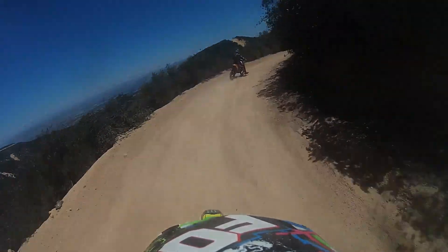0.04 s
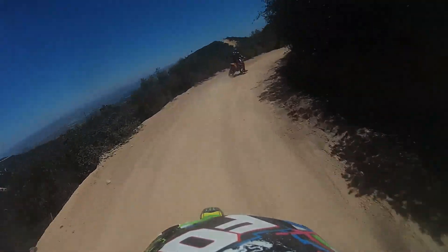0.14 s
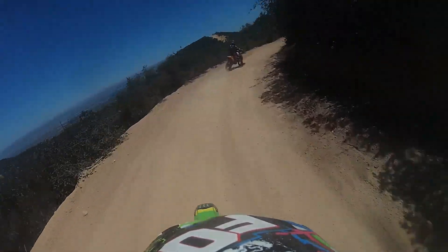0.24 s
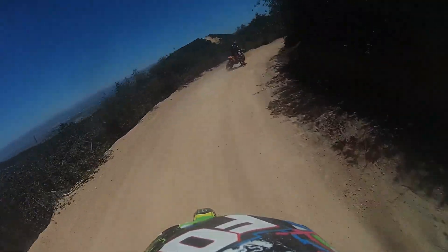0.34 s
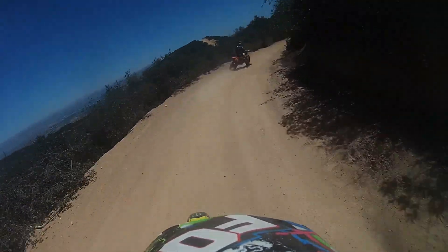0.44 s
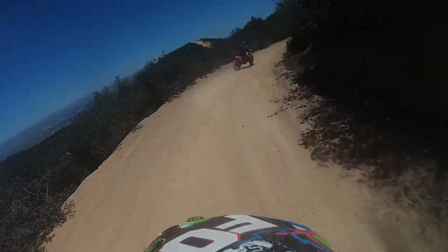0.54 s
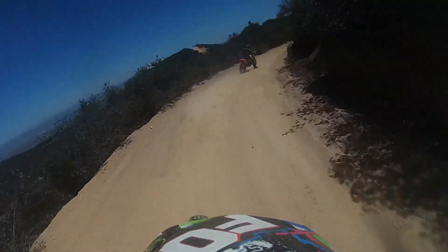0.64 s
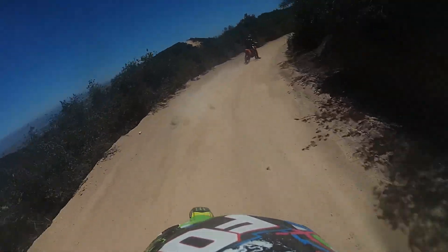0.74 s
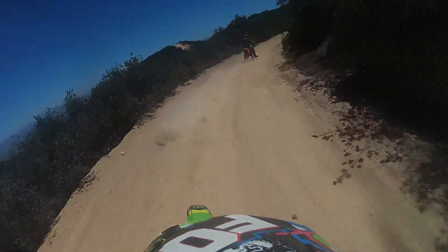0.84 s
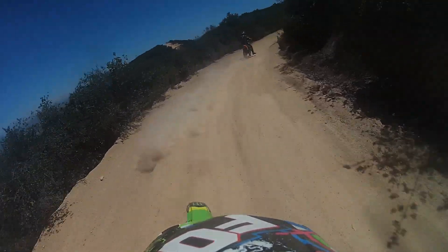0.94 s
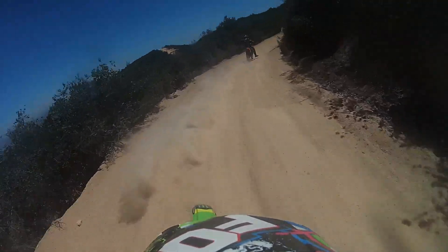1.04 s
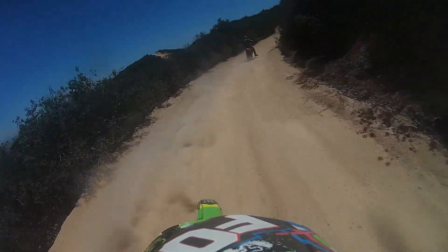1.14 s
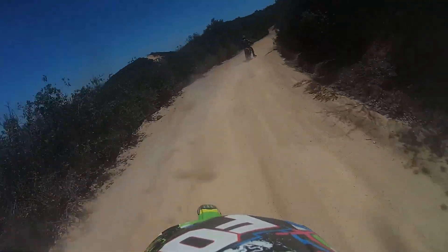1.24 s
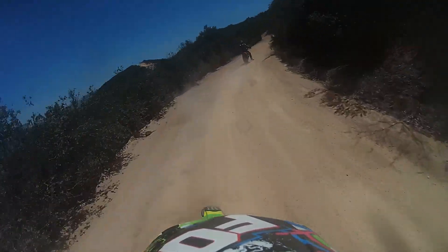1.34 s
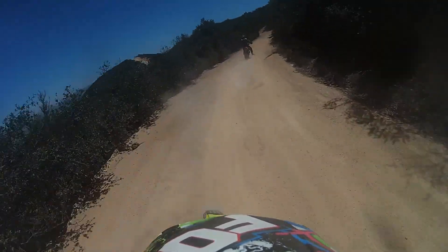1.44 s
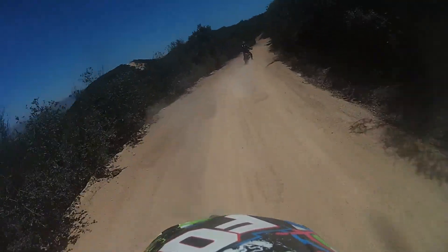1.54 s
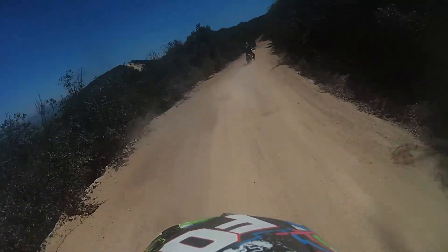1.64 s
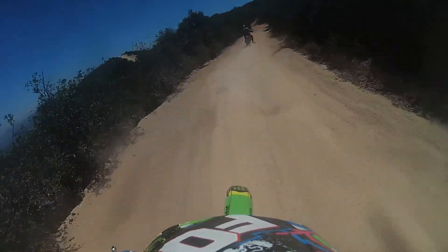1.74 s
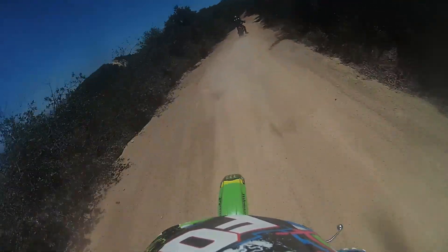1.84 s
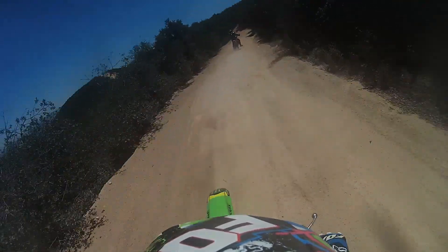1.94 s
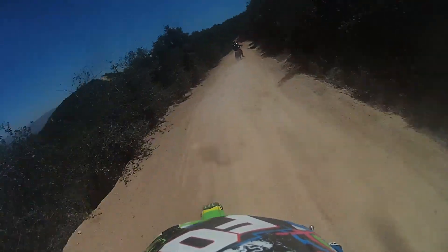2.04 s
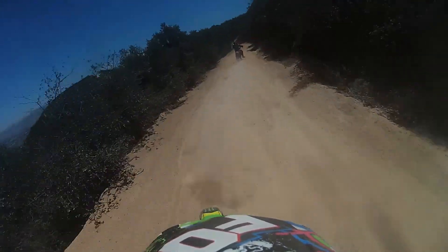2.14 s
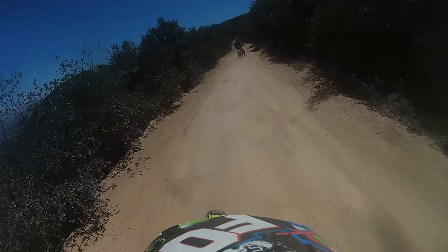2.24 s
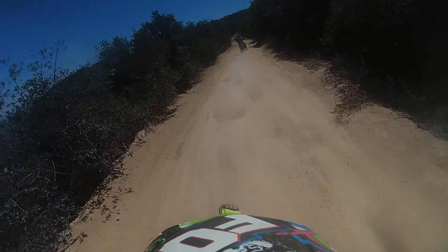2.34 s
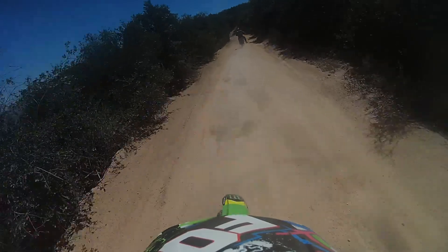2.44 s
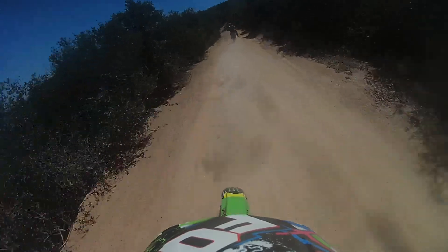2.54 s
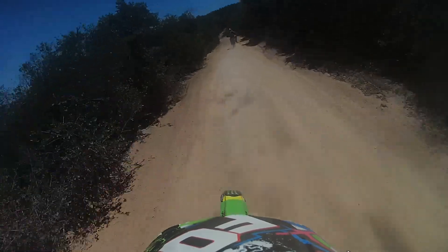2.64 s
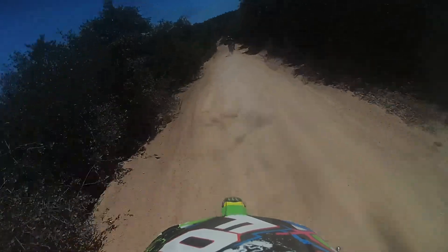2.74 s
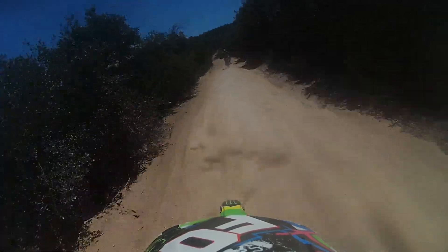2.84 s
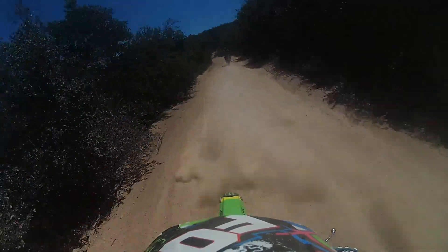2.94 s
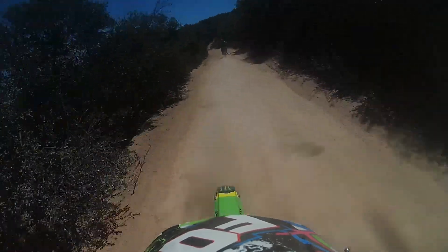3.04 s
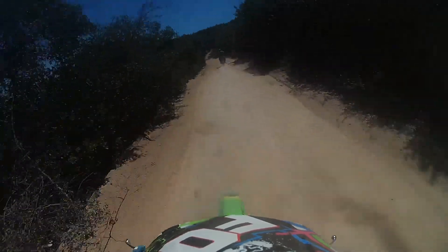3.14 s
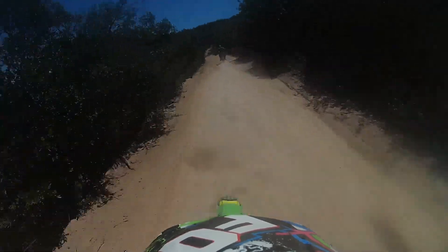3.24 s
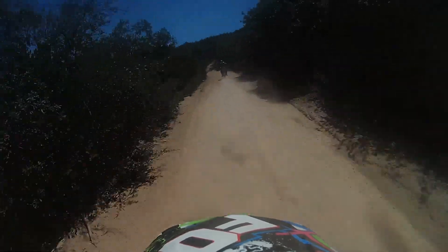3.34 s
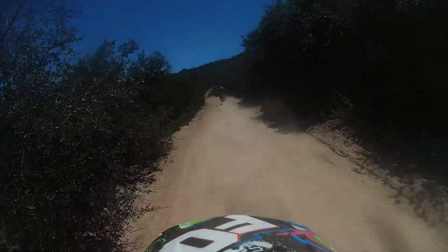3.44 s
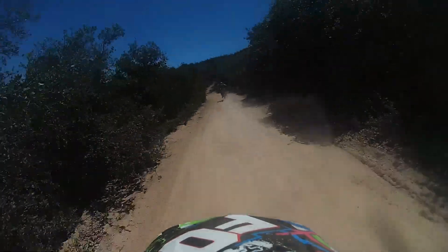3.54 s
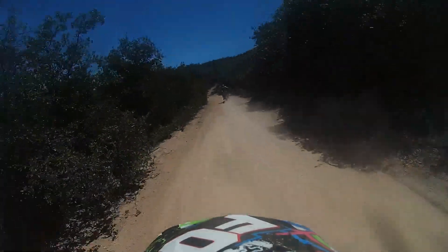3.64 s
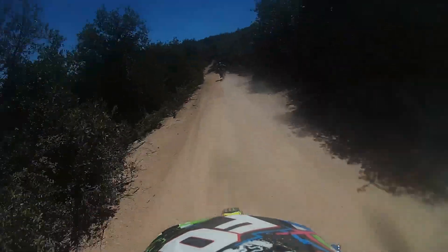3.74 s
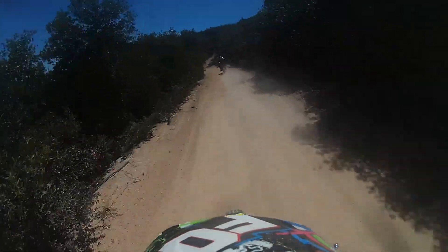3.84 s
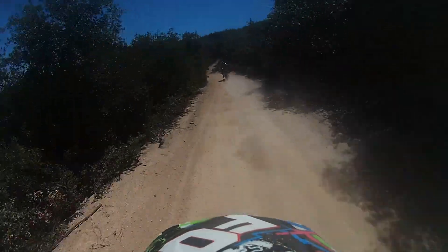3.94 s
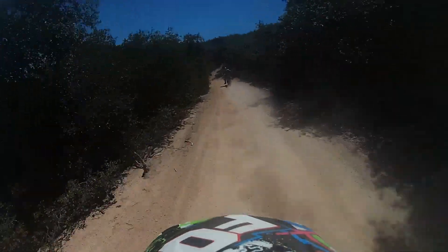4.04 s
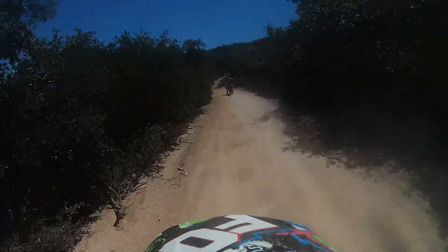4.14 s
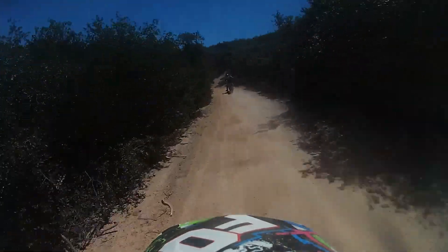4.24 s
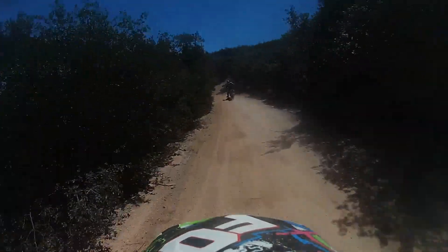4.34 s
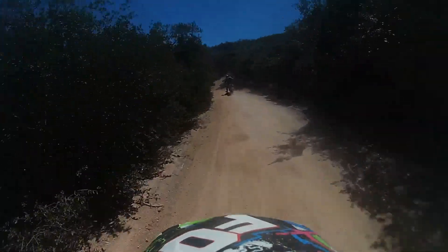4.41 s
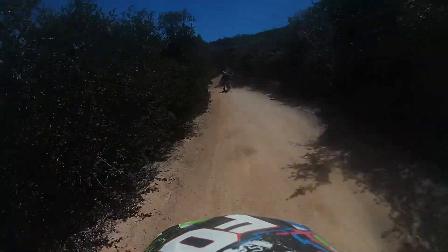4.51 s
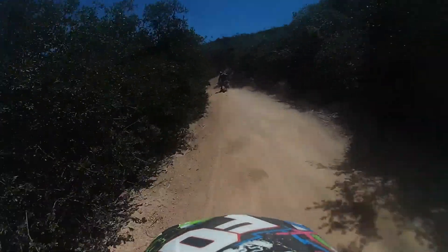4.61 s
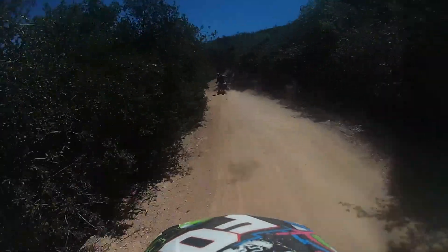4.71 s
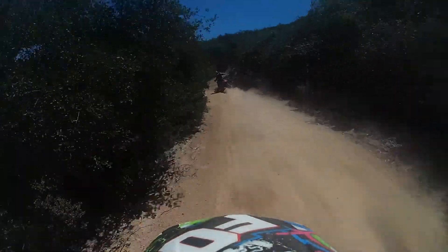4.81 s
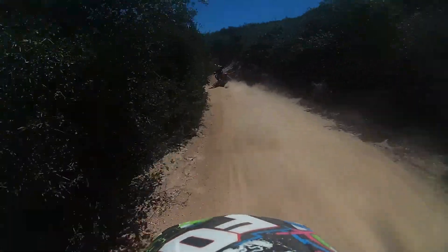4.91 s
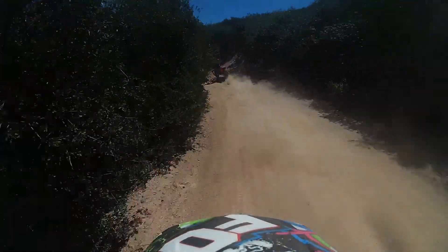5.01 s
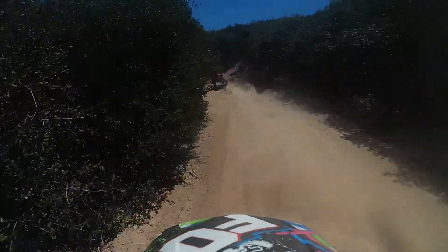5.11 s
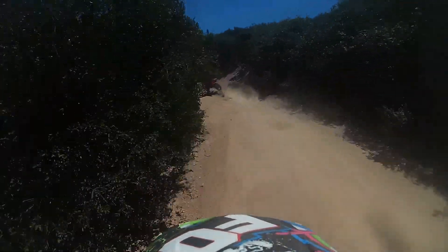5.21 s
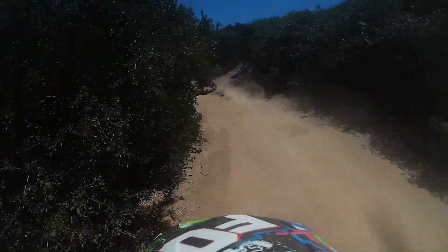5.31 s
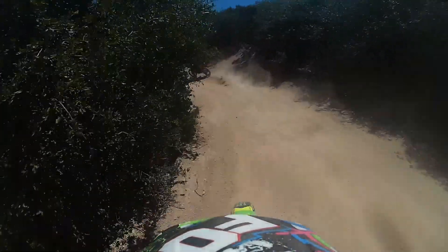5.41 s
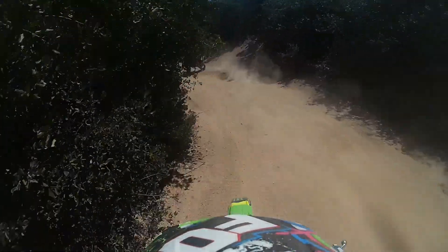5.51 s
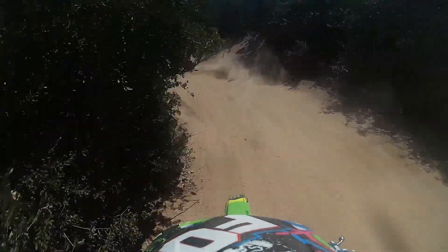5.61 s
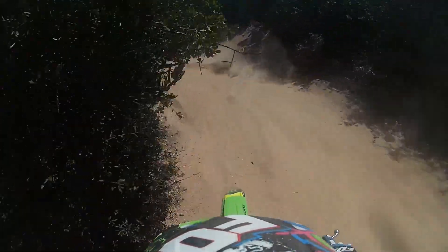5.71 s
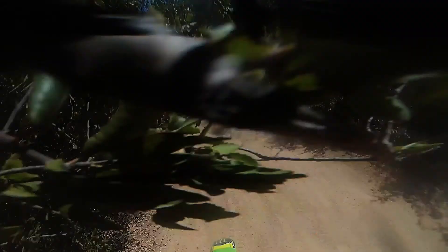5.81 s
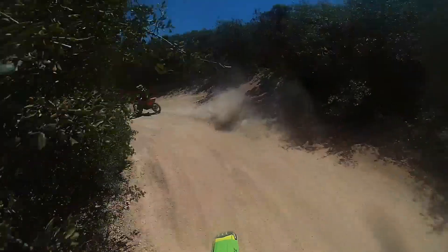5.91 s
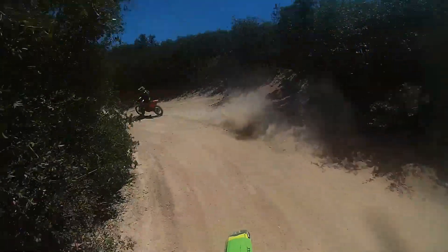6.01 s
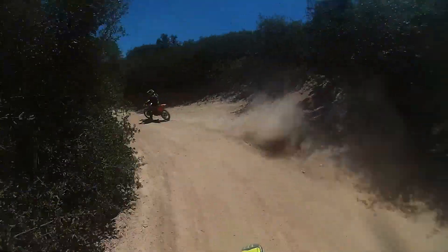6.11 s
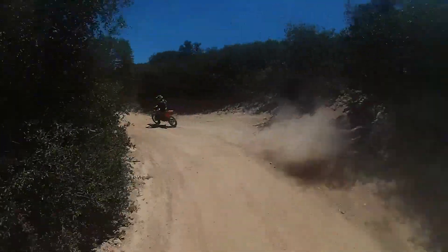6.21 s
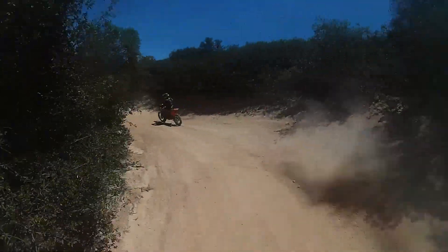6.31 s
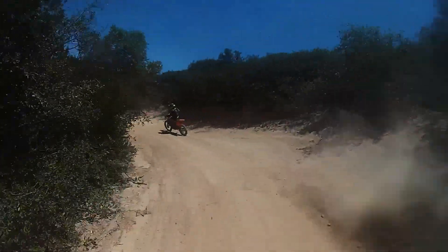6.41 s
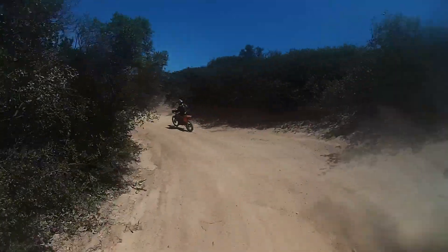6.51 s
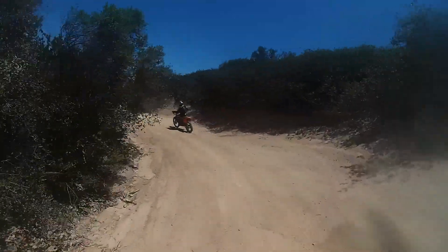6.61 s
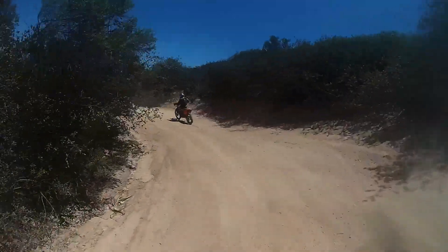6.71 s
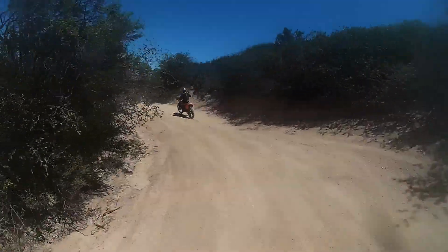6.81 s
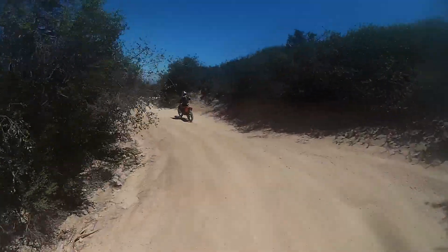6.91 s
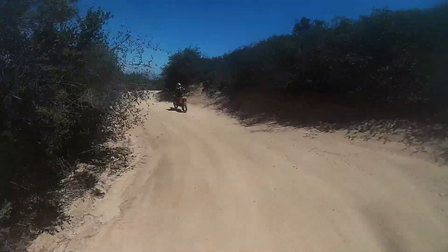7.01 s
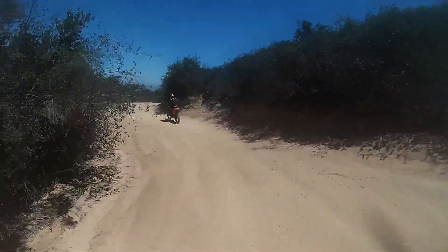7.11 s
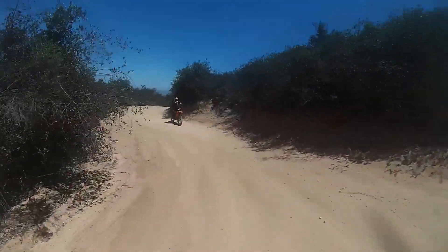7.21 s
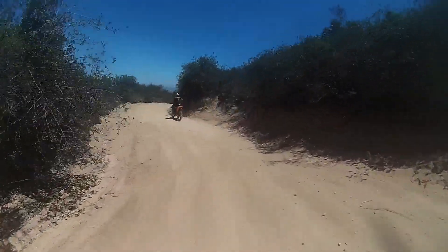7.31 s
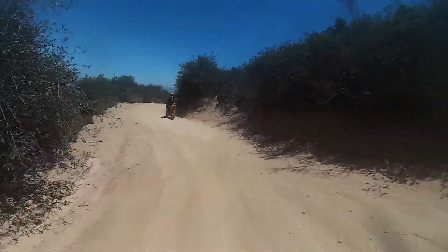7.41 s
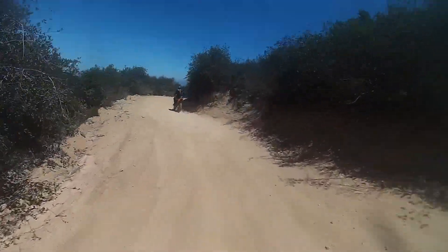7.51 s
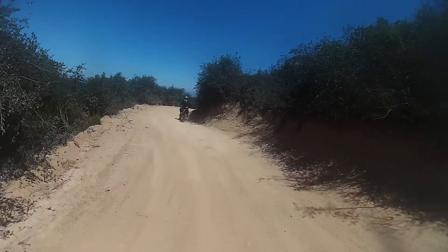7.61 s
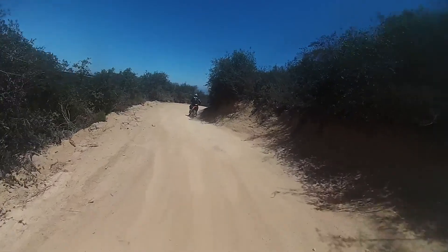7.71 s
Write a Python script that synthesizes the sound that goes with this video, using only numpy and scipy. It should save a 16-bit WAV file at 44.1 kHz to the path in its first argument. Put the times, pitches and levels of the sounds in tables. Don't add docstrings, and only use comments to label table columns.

```python
import sys
import numpy as np
from scipy import signal
from scipy.fft import rfft, irfft, next_fast_len
from scipy.io import wavfile
from scipy.ndimage import uniform_filter1d

SR = 44100
rng = np.random.default_rng(int(sys.argv[2]) if len(sys.argv) > 2 else 0)


def gain_from_db(level_db):
    decades = np.asarray(level_db, float) / 20
    return 10 ** decades


def unload_audio(sound):
    columns = np.transpose(np.atleast_2d(sound))
    steps = np.round(np.clip(columns, -1, 1) * 32767)
    wavfile.write(sys.argv[1], SR, steps.astype(np.int16))


N = 342216

# pitch_hz, level_db (per Hz for noises) # faint air hiss
HISS_SPECTRUM = [(1800, -40), (3000, -2), (4300, -4.5), (5400, -4.5), (6900, -7), (9200, -16),
                 (11800, -15.5), (13200, -16), (15500, -45)]
WIND_SPECTRUM = [(5, -27), (10, -1), (30, 1.5), (60, 3.5), (100, -10.5), (160, -13), (260, -32),
                 (500, -120)]
ROLL_SPECTRUM = [(71, -31), (120, -12), (167, 1.5), (232, -6.5), (323, -0.5), (544, -20.5), (821, -13.5),
                 (1050, -16.5), (1440, 3.5), (1800, -15), (2600, -15), (3200, -28), (4160, -60),
                 (7040, -120)]
RATTLE_SPECTRUM = [(1000, -32), (1800, -3.5), (2340, -3.5), (3300, -19), (3800, -9), (4700, -21),
                   (4970, -7), (5600, -5), (6100, -23), (6950, -9.5), (7800, -21), (8400, -18),
                   (12300, -24), (15600, -40)]
SNAP_SPECTRUM = [(350, -1), (850, -21.5), (2200, 0), (6000, -6), (9000, -16.5), (14500, -19.5),
                 (15600, -48)]
PIPE_SPECTRUM = [(130, -18), (190, -9), (240, -3), (295, 5), (365, -17), (450, -8), (540, -15), (640, -10),
                 (720, -15), (830, -19), (950, -22), (1250, -19), (1500, -40)]
BURBLE_SPECTRUM = [(59, -37), (100, 1), (179, -7.5), (206, 1.5), (257, -5.5), (302, 5), (380, -8),
                   (524, -11), (806, -14.5), (1100, -11.5), (1430, -32.5), (2420, -120)]
CLATTER_SPECTRUM = [(500, -40), (750, -19), (1000, -16.5), (1300, -2), (1450, 1), (1700, -12), (2060, -17),
                    (2190, -13.5), (2400, -17), (2580, -7), (2750, -18), (3300, -25.5), (4400, -30.5),
                    (6500, -84.5)]
GRIT_SPECTRUM = [(2000, -44.5), (3300, -10), (3900, -5), (4650, -12), (5000, -2), (5600, -6.5), (6150, -14),
                 (6950, -9), (7750, -19.5), (8400, -16), (9200, -21.5), (12400, -24.5), (14000, -32.5),
                 (16000, -70.5)]

# time_s, rumble_db
GUSTS = [(0, -59), (.35, -61), (1.4, -57), (1.8, -61), (2.8, -61), (3.3, -55), (3.8, -56), (4.3, -60),
         (5.0, -57), (6.1, -58), (6.5, -63), (7.4, -58), (7.76, -61)]
# time_s, peak_db
TICKS = [(0.0184, -52), (0.0314, -61), (0.044, -58), (0.056, -56), (0.067, -55), (0.3815, -51),
         (0.5693, -52.5), (0.625, -54.5), (0.7505, -53.5), (1.18, -53), (1.335, -58), (2.4567, -60),
         (5.4097, -62)]
# start_s, end_s, first_db, last_db, regular_share (0-1)
BUZZES = [
    (.01, 0.215, -72, -64, 0.5),
    (0.34, 0.409, -70, -64, .2),
    (0.181, 0.351, -57, -52.5, 0.42),
    (0.907, 1.17, -67, -60, 0.1),
    (1.548, 1.7, -68, -69, 0.4),
    (1.882, 2.144, -65.5, -53, 0.15),
    (2.121, 2.243, -67, -59.5, 0.28),
    (3.045, 3.133, -67, -60, 0.23),
]
# time_s, peak_db, half_length_s
BUMPS = [(0.861, -43, 0.0091), (1.362, -70, 0.013), (1.508, -50, 0.012), (3.15, -34, 0.0085),
         (3.362, -39.5, 0.0093), (3.451, -52, 0.011), (3.788, -37.5, 0.015), (4.495, -39, 0.0094),
         (4.606, -34.5, 0.0073), (4.773, -36, 0.011), (4.848, -42, 0.014), (4.932, -30, 0.0078),
         (4.984, -38, 0.0097), (5.067, -31.5, 0.0078), (5.219, -35.5, 0.011), (5.379, -40, 0.01),
         (5.444, -39.5, 0.018)]
# time_s, peak_db,
# half_length_s, direction (1 or -1)
PUSHES = [(3.225, -32.5, 0.016, -1), (3.246, -34, 0.0084, 1), (3.74, -42, 0.018, -1),
          (5.8413, -10.5, 0.00084, 1), (5.8495, -7.5, 0.0016, 1), (5.8595, -30.5, 0.0011, 1),
          (5.8685, -22.5, 0.0014, -1), (5.8755, -20, 0.00068, 1), (5.882, -25.5, .002, 1),
          (5.8925, -19, 0.0026, -1), (5.902, -19.5, 0.0059, 1), (5.93, -28, 0.00079, 1),
          (5.941, -24.5, 0.006, -1)]
# time_s, peak_db, ring_hz, ring_t60_s, snap_db (over the ring)
STRIKES = [(.0035, -15.5, 2290, 0.011, -7), (5.8396, -6.5, 2160, 0.012, 1.5),
           (5.8424, 20, 2430, 0.0063, -21), (5.8472, -3.5, 1890, 0.021, 1.5),
           (5.8523, -13, 3108, 0.014, 0.5), (5.851, -17, 2480, 0.018, -20), (5.8534, 4.5, 3860, .012, 2),
           (5.853, -19.5, 3404, 0.017, -25), (5.8588, 5, 1939, .022, -8.5), (5.863, -11, 2380, 0.02, -21),
           (5.869, -25.5, 2012, 0.016, -21.5), (5.879, -42.5, 1990, 0.016, 0.5),
           (5.891, -36, 2521, .01, -6), (5.893, -22, 2037, 0.019, -10.5), (5.903, -19, 2172, 0.033, -17.5),
           (5.908, -35.5, 2020, 0.028, -8.5), (5.915, -21, 1969, 0.016, -5), (5.916, -6, 3773, .012, -19),
           (5.921, -8.5, 2236, 0.031, -19), (5.9275, -8, 2432, 0.018, 1), (5.93, -12, 1956, 0.023, -20),
           (5.9359, -3, 1837, 0.012, -8.5), (5.937, -8.5, 2496, 0.015, 5)]
# time_s, level_db
DRAG = [
    (5.86, -88),
    (5.866, -34),
    (5.884, -64),
    (5.903, -43.5),
    (5.913, -50.5),
    (5.94, -37),
    (5.955, -89),
    (5.97, -104),
]
# pitch_hz, level_db, t60_s
BUCKLE = [(66, 17, .2), (255, 9, .13), (2164, -5, .16), (2977, 0, .2), (3348, -6, .19), (3731, -12, .17),
          (4200, -16, .15), (5351, -18, .15), (5475, -18, .2), (5647, -3, .25), (6621, -12, .1),
          (7504, -11, .33)]
# time_s, gain_db
COVER = [
    (5.825, 0.5),
    (5.84, 9.5),
    (5.991, -10),
    (6.01, -1.5),
]
# time_s, peak_db
POPS = [(1.579, -40), (5.32, -48), (5.409, -43), (5.457, -50), (5.78, -38), (6.25, -51), (6.488, -47),
        (6.763, -47), (6.81, -37), (6.852, -36), (6.899, -40), (6.924, -43), (6.971, -42), (7.266, -47),
        (7.32, -46)]
# time_s, firings_hz
SPEED = [(0, 52.7), (.55, 51.4), (.75, 55.97), (1.14, 63.24), (1.48, 59.22), (1.58, 61.7), (1.77, 72.1),
         (1.96, 63.43), (2.33, 64.72), (2.91, 95.87), (3.45, 94.67), (3.58, 75.5), (4.4, 70.08),
         (4.86, 53.57), (5.65, 44), (7.15, 44.87), (7.61, 51.6), (7.76, 49.86)]
# middle_s, half_length_s,
# change_share (below 0 sags)
SPEED_BENDS = [
    (1.66, 0.082, 0.016),
    (1.83, 0.067, 0.024),
    (2.54, 0.092, 0.0057),
    (2.629, .08, -.035),
    (2.73, .07, .025),
    (2.83, 0.048, -0.008),
    (3.0, .06, -.1),
    (3.096, .06, 0.074),
    (3.27, .2, -0.047),
    (6.602, 0.38, .13),
]
# open_s, shut_s, added_regular_share (below 0 when
THROTTLE = [(0, .6, .15), (.6, .8, .35), (.8, 1.2, .72), (1.2, 1.42, .2), (1.58, 1.86, .68),
            (1.86, 2.14, .62), (2.29, 2.47, .62), (2.47, 2.98, .76), (2.99, 3.14, .6), (3.14, 3.22, .2),
            (3.22, 3.47, .58), (4.2, 4.46, .03), (5.36, 5.52, 0), (6.79, 6.95, .15), (6.99, 7.24, -.1),
            (7.26, 7.43, .5), (7.43, 7.9, .72)]
# exhaust_db, clatter_db, harmonics_above_400_hz_db
PULL = [(2, 2, -4), (2, -0.5, 2), (8, 0, -4.5), (3, -2, 1.5), (8, 1.5, -3), (5.5, -2.5, 0), (5, -0.5, -2.5),
        (7.5, 2, 2), (6.5, 2, 5), (3, 0.5, 5), (2, 0.5, 9.5), (-1.5, 1.5, 6), (4.5, 4, 0), (5, 6.5, 0),
        (-2, -5, 4), (7.5, 4, -4), (7.5, 3, -1.5)]

MID_HZ = 60


def evened(x):
    return x / np.sqrt(np.mean(x ** 2) + 1e-20)


def over_time(rows):
    return np.interp(np.arange(N) / SR, *np.transpose(rows))


def read_spectrum(points, hz):
    point_hz, point_db = np.transpose(points)
    return np.interp(np.log(hz + 1), np.log(point_hz + 1), point_db)


def colour(x, points):
    size = next_fast_len(N)
    gain = gain_from_db(read_spectrum(points, np.fft.rfftfreq(size, 1 / SR)))
    return evened(irfft(rfft(x, size) * gain, size)[:N])


def white():
    return rng.standard_normal(N)


def drift(rate_hz):
    slow = signal.butter(2, rate_hz, fs=SR, output="sos")
    return evened(signal.sosfilt(slow, white()))


def add(mix, time_s, sound):
    part = mix[max(round(time_s * SR), 0):][:len(sound)]
    part += sound[:len(part)]


def firing_rate():
    t = np.arange(N) / SR
    bend = np.ones(N)
    for middle_s, half_s, share in SPEED_BENDS:
        place = np.clip((t - middle_s) / half_s, -1, 1)
        bend += share * np.cos(np.pi / 2 * place) ** 2
    return over_time(SPEED) * bend


def wind():
    lumps = gain_from_db(2.5 * drift(8))
    rumble = gain_from_db(over_time(GUSTS) + 3.0) * colour(lumps * white(), WIND_SPECTRUM)
    hiss_db = -71 + 4.0 * np.log2(firing_rate() / MID_HZ)
    return rumble + gain_from_db(hiss_db) * colour(white(), HISS_SPECTRUM)


def tyres():
    return gain_from_db(-55.5) * colour(white(), ROLL_SPECTRUM)


def ticks():
    out = np.zeros(N)
    t = np.arange(500) / SR
    scratch = colour(white(), RATTLE_SPECTRUM)
    ring = np.sin(2 * np.pi * 5530 * t)
    for time_s, peak_db in TICKS:
        fade = gain_from_db(peak_db - 60 * t / 0.02)
        add(out, time_s, fade * (ring + scratch[round(time_s * SR):][:len(t)]))
    return out


def buzz():
    out = np.zeros(N)
    tap = rng.standard_normal(300) * gain_from_db(-60 * np.arange(300) / SR / 0.021)
    hiss = white()
    for start_s, end_s, first_db, last_db, share in BUZZES:
        t = np.arange(0, end_s - start_s, 1 / SR)
        hits = np.diff(np.floor(98 * t), prepend=-1)
        taps = signal.oaconvolve(hits, tap)[:len(t)]
        loose = hiss[round(start_s * SR):][:len(t)]
        mix = np.sqrt(share) * evened(taps) + np.sqrt(1 - share) * loose
        level = gain_from_db(np.linspace(first_db, last_db, len(t)))
        add(out, start_s, level * mix * signal.windows.tukey(len(t), .25))
    return colour(out, RATTLE_SPECTRUM) * np.sqrt(np.mean(out ** 2))


def jolts(rows):
    out = np.zeros(N)
    for time_s, peak_db, half_s, *direction in rows:
        u = np.arange(-3, 8, 1 / (half_s * SR))
        pull = np.exp(-u ** 2)
        rebound = .45 * np.exp(-((u - 2.2) / 1.8) ** 2)
        add(out, time_s - 3 * half_s, np.sign(direction or 1) * gain_from_db(peak_db) * (rebound - pull))
    return out


def buckle():
    t = np.arange(SR // 4) / SR
    ring = np.zeros(len(t))
    for hz, level_db, t60_s in BUCKLE:
        ring += gain_from_db(-45.5 + level_db - 60 * t / t60_s) * np.sin(2 * np.pi * hz * t)
    out = np.zeros(N)
    add(out, 5.937, ring)
    return out


def strikes():
    crackle = colour(white(), SNAP_SPECTRUM)
    out = gain_from_db(over_time(DRAG) + 1.4 * drift(300)) * crackle
    t = np.arange(2600) / SR
    onset = 1 - np.exp(-t / 0.00019)
    for time_s, peak_db, hz, t60_s, snap_db in STRIKES:
        wobble = evened(uniform_filter1d(rng.standard_normal(len(t)), size=30))
        ring = np.sin(2 * np.pi * hz * t + 0.8 * wobble) * gain_from_db(-60 * (t / t60_s) ** 0.88)
        snap = crackle[round(time_s * SR):][:len(t)] * gain_from_db(snap_db - 60 * t / (0.54 * t60_s))
        add(out, time_s, gain_from_db(peak_db) * onset * (ring + snap))
    return out


def pops():
    out = np.zeros(N)
    t = np.arange(2200) / SR
    ring = np.sin(2 * np.pi * 283 * t)
    onset = 1 - np.exp(-t / 0.00051)
    for time_s, peak_db in POPS:
        soft = uniform_filter1d(uniform_filter1d(rng.standard_normal(len(t)), size=12), size=16)
        puff = evened(soft) * gain_from_db(-10.5 - 60 * t / 0.036)
        add(out, time_s, gain_from_db(peak_db - 4.0 - 60 * t / 0.063) * onset * (ring + puff))
    return out


def throttle():
    t = np.arange(N) / SR
    ramp_s = .08
    held = [np.clip(np.minimum(t - open_s, shut_s - t) / ramp_s + .5, 0, 1)
            for open_s, shut_s, _ in THROTTLE]
    added_share = np.asarray(THROTTLE)[:, 2]
    return np.column_stack([added_share, PULL]).T @ held


def exhaust_drone(hz, turns, lift_db):
    drone = np.zeros(N)
    for k in range(2, 22):
        wander_db = (1.5 + .15 * k) * drift(5)
        level_db = read_spectrum(PIPE_SPECTRUM, k * hz) + lift_db * (k * hz > 400) + wander_db
        drone += gain_from_db(level_db) * np.cos(2 * np.pi * (k * turns + rng.random()))
    return drone / np.sqrt(uniform_filter1d(drone ** 2, size=6000))


def frame_shake(hz, turns):
    resonance = 1 / np.hypot(1, (hz - 75) / 13.3)
    return gain_from_db(-57.5 + 4 * drift(12) + 2.0 * drift(1.5)) * resonance * np.cos(2 * np.pi * turns)


def firing_swell(turns):
    strength = rng.standard_normal(1000)[turns.astype(int)]
    swell = 1 + .9 * np.sin(np.pi * (turns % 1) ** .6) ** 2 * gain_from_db(2.5 * strength)
    return swell / np.sqrt(uniform_filter1d(swell ** 2, size=8000))


def engine():
    hz = firing_rate() * (1 + .004 * drift(12))
    turns = np.cumsum(hz) / SR
    octaves = np.log2(hz / MID_HZ)
    added_share, exhaust_db, clatter_db, lift_db = throttle()
    regular = .15 + added_share

    drone = exhaust_drone(hz, turns, lift_db)
    swell = firing_swell(turns)
    burble = colour(swell * white(), BURBLE_SPECTRUM)
    exhaust = np.sqrt(regular) * drone + np.sqrt(1 - regular) * burble

    clatter = colour(swell * white(), CLATTER_SPECTRUM)
    clatter += gain_from_db(-19.0) * colour(swell * gain_from_db(0.69 * drift(30)) * white(), GRIT_SPECTRUM)

    exhaust *= gain_from_db(-56.5 + 10 * octaves + exhaust_db)
    clatter *= gain_from_db(-55 + 15 * octaves + clatter_db)
    return exhaust + clatter + frame_shake(hz, turns)


def scene():
    bike = gain_from_db(over_time(COVER)) * (tyres() + engine()) + buzz() + pops()
    helmet = jolts(BUMPS) + jolts(PUSHES) + ticks()
    branch = strikes() + buckle()
    return (wind() + helmet + branch + bike)[None]


def roll_off(x):
    return signal.sosfilt(signal.butter(12, 15600, fs=SR, output="sos"), x)


def record(dry):
    clipped = np.clip(dry, -.97, .97)
    band_limit = signal.firwin(255, 15500, fs=SR)[None]
    mix = signal.oaconvolve(clipped, band_limit, "same")
    return roll_off(mix)


dry = scene()
out = record(dry)
unload_audio(out)
```